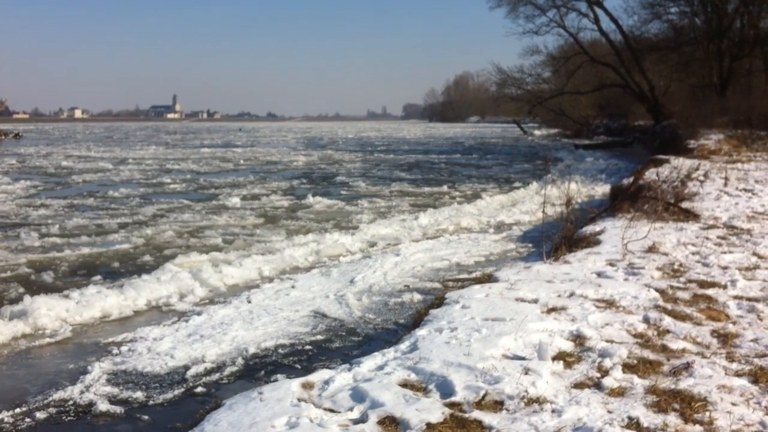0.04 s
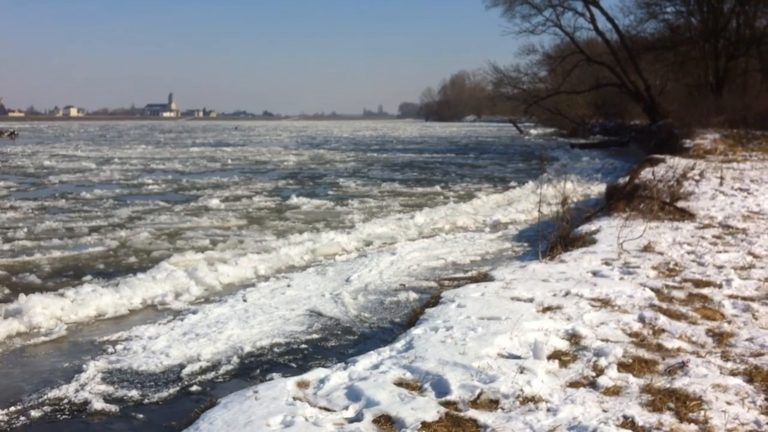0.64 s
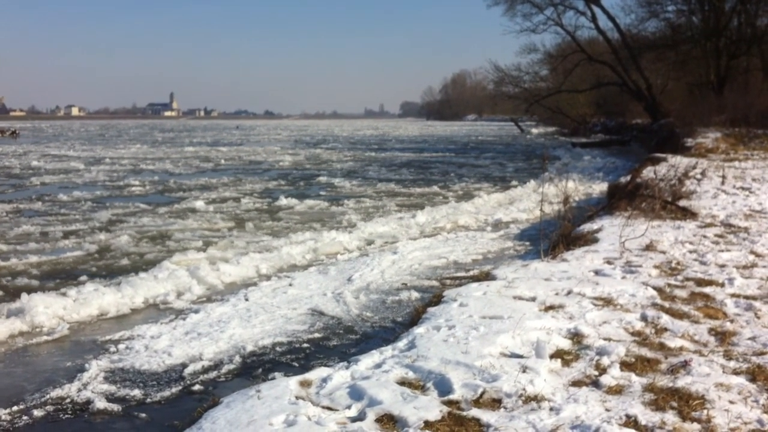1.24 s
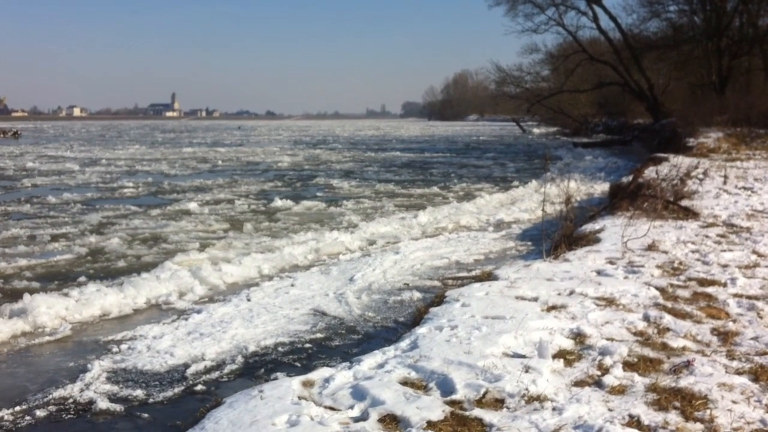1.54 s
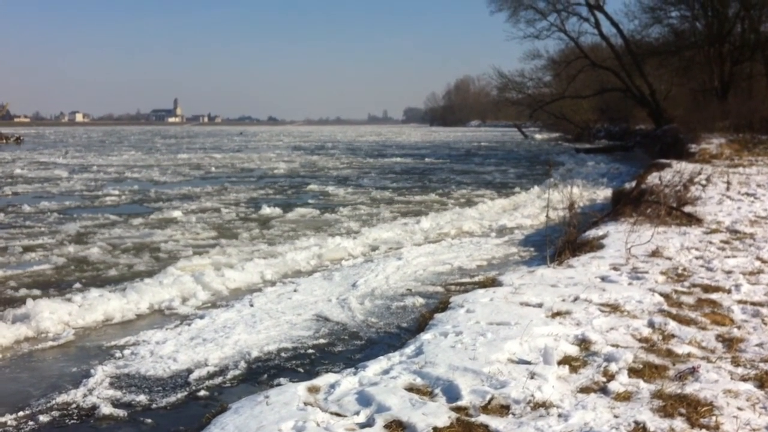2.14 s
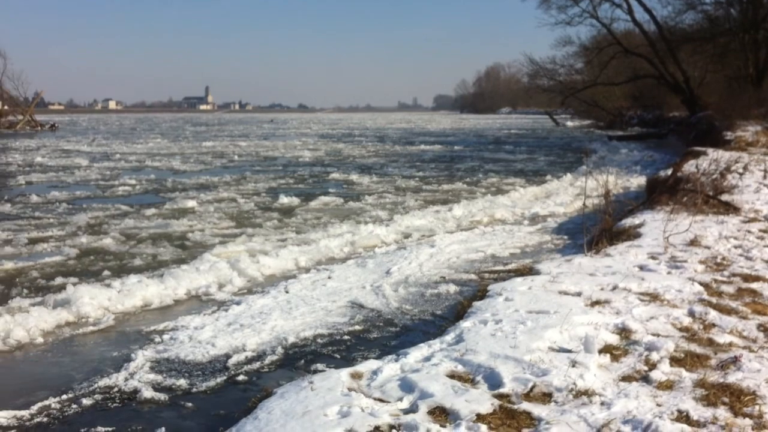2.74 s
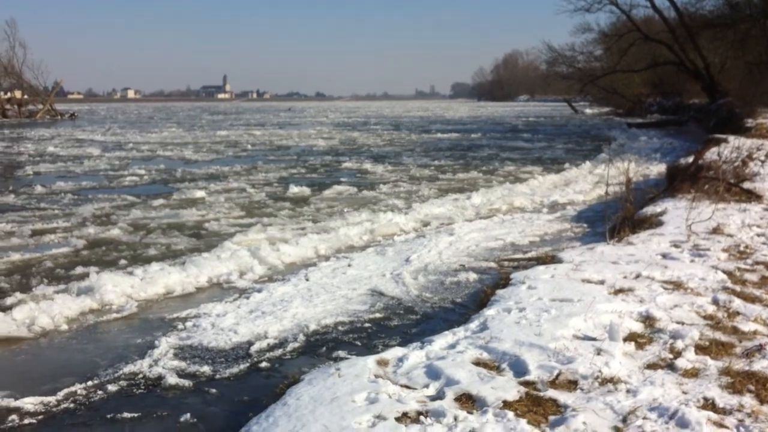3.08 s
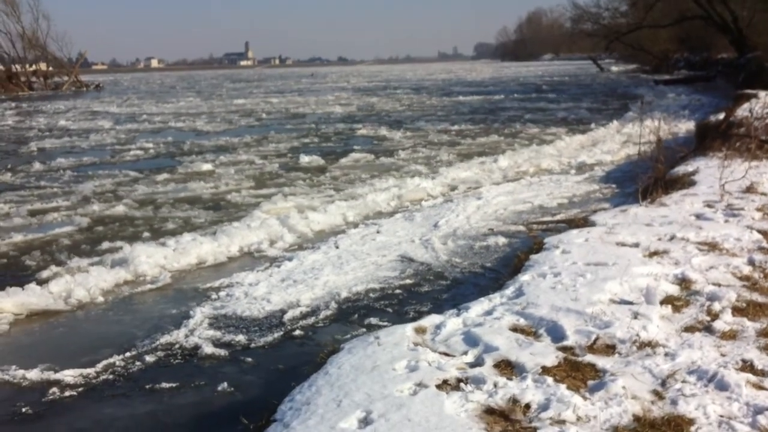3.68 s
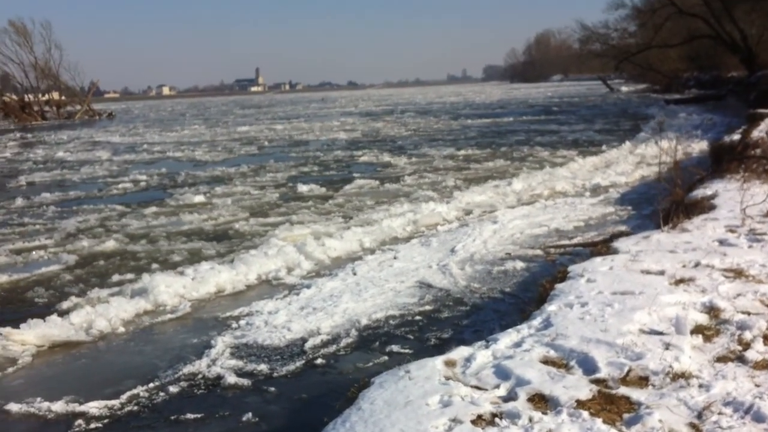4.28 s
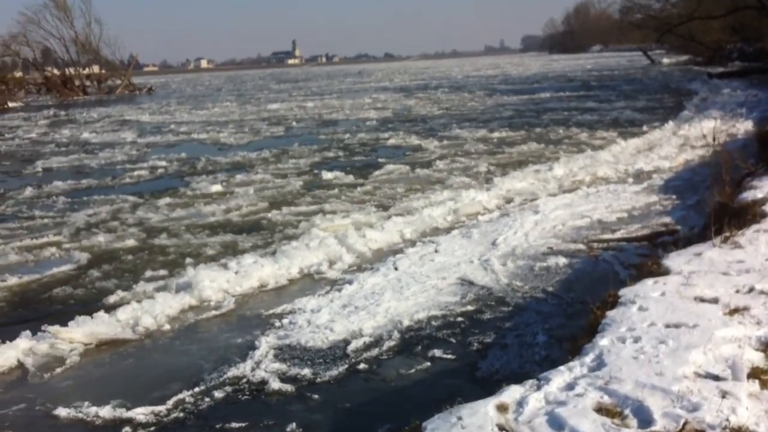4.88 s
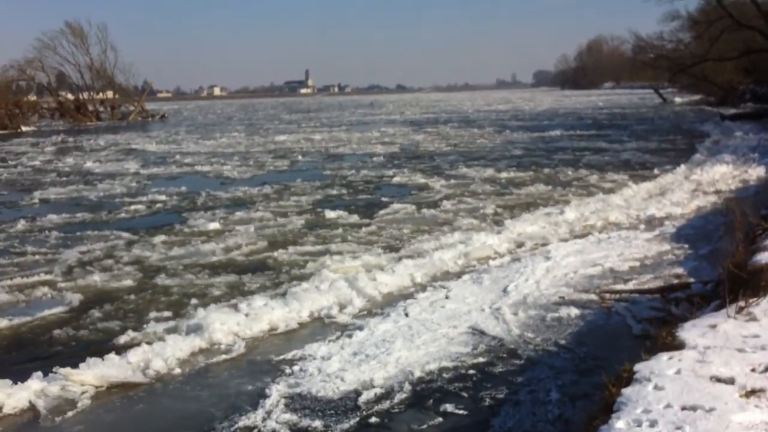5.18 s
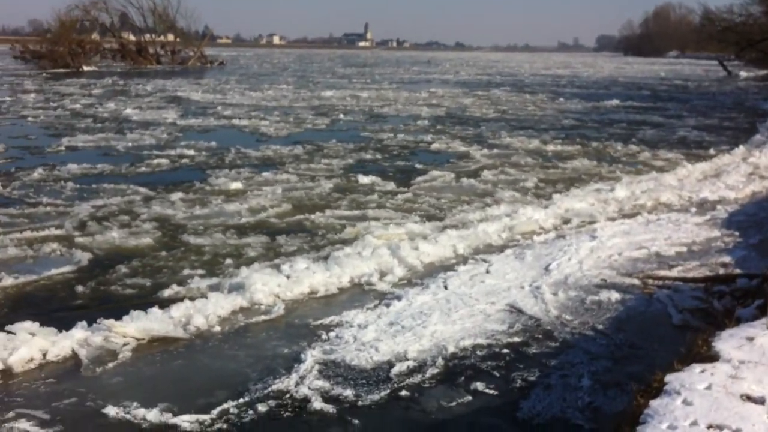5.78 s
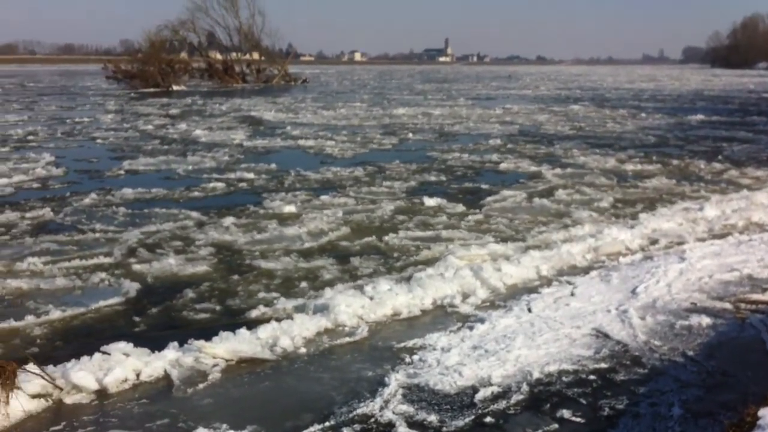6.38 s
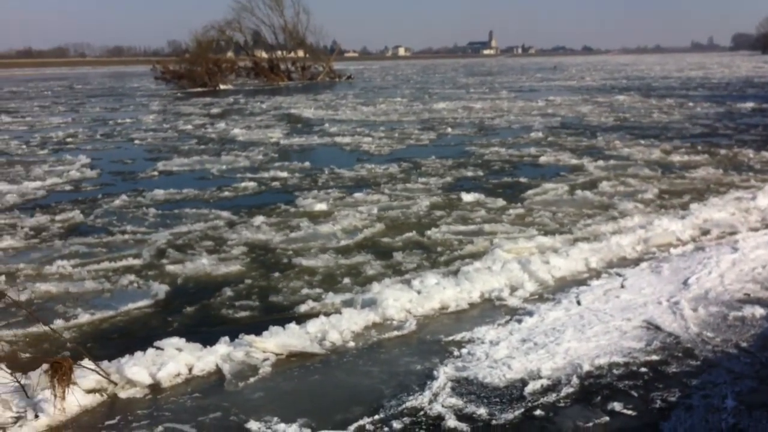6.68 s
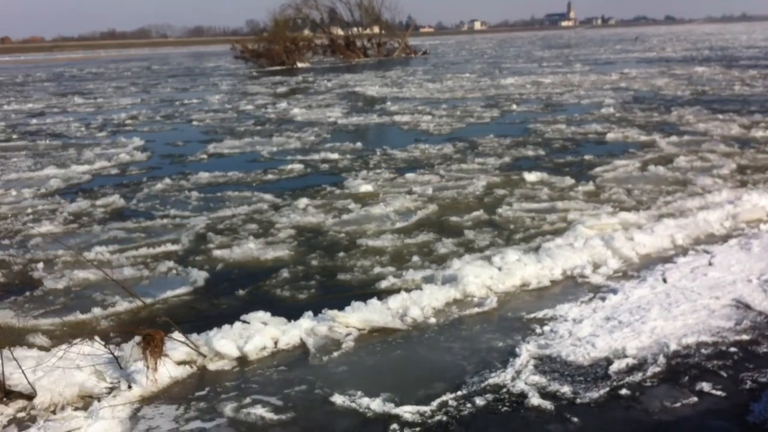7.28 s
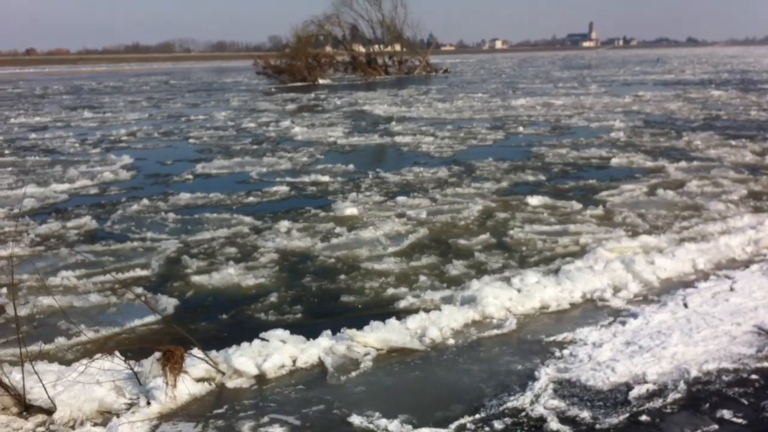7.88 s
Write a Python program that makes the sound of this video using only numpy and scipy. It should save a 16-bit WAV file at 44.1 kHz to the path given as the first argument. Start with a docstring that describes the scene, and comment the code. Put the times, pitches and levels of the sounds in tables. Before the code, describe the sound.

Gusts thump on the microphone, a sharp handling knock follows, then ice floes softly rub, bump and crackle in lapping water.

```python
"""Snowy river bank, drifting ice floes. Water washes and splashes between them; rims rub, scrape
and bump; slush fizzes, thin ice snaps and clinks, trapped air glugs. Light wind buffets the
microphone for the first 4 s. Its housing takes one sharp knock, then it turns to the open river:
fuller wash, more near bumps. Far off, a small bird and a low rumble."""
import sys
import numpy as np
from scipy import signal
from scipy.fft import rfft, irfft, next_fast_len
from scipy.io import wavfile
from scipy.ndimage import uniform_filter1d, map_coordinates

SR = 44100
rng = np.random.default_rng(int(sys.argv[2]) if len(sys.argv) > 2 else 0)


def dump(signal):
    """Clip the signal to [-1, 1] and save it as 16-bit WAV at the path in sys.argv[1]."""
    limited = np.clip(np.atleast_2d(signal).T, -1, 1)
    pcm = np.round(limited * 32767).astype(np.int16)
    wavfile.write(sys.argv[1], SR, pcm)


N = 349713
TURN_S = 4  # microphone turns from bank to river

# water between floes: t/s, level/dB
WASH_LEVELS = [(0, -63.5), (3.0, -63.5), (3.3, -59), (4.75, -62.5), (4.95, -57.5), (5.5, -58), (6.65, -59),
               (7.93, -60)]
# water spectrum: f/Hz, level/dB
WASH_SPECTRUM = [(60, -33), (200, -11), (320, -1.5), (480, 2), (800, -0.5), (1100, 1), (1450, -2),
                 (1900, -15.5), (3500, -20)]
# how hard the floes press together: t/s, level/dB
FLOE_PRESSURE = [(0, -2), (.9, 0), (1.38, -1.5), (1.75, 0.4), (2.25, -0.7), (3.1, 1.5), (4.35, -1.1),
                 (5.1, 0.35), (6.1, 0.1), (6.9, 2.5), (7.45, 0.5), (7.93, 1.5)]
# ice spectra, along the bank and on the open river: f/Hz, level/dB
BANK_SPECTRUM = [(350, -45), (600, -15), (789, 2), (930, -11), (995, -8), (1260, -2), (1310, -11.5),
                 (1630, -1.5), (1900, -3), (2250, -1.5), (3020, -5), (5280, -7.5), (5820, -7.5),
                 (11800, -11.5), (15800, -19)]
RIVER_SPECTRUM = [(350, -30), (600, 0), (778, -3), (982, 6), (1420, -8.5), (1540, -4), (2030, -4.5),
                  (2670, -4.5), (3060, -5.5), (5280, -5.5), (12200, -10.5), (14900, -11), (15800, -21)]
# near floe collisions: t/s, level/dB, f/Hz
NEAR_BUMPS = [(3.405, -34, 696), (4.254, -39, 800), (5.091, -40, 410), (5.328, -42, 323),
              (5.368, -36, 1300), (5.4918, -34.5, 800), (5.4928, -29, 1900), (5.495, -31.5, 450),
              (5.728, -35, 950), (6.255, -40, 720), (6.609, -31.5, 1540), (6.805, -37, 1700),
              (7.432, -47, 600), (7.4935, -31, 1170)]
# near ice snaps: t/s, level/dB, f/Hz, decay/s, Q
NEAR_CRACKLES = [(.232, -56, 2300, 0.0062, 6.7), (.797, -54, 4500, 0.0097, 6), (.886, -57, 2700, 0.0089, 7),
                 (1.142, -53, 12500, 0.032, 2.8), (1.609, -47.5, 2600, 0.004, 6),
                 (1.608, -49.5, 3480, .006, 11), (1.643, -51, 14500, .014, 5),
                 (1.725, -50, 11500, 0.022, 1.8), (2.436, -57, 3600, 0.0071, 12),
                 (2.556, -56, 3850, .006, 12), (2.573, -52, 10000, .015, 3.5), (2.592, -53, 3870, .01, 12),
                 (4.58, -39.5, 6200, 0.0019, 11), (4.5825, -49, 3730, 0.0025, 12),
                 (4.6085, -51, 4750, .002, 4.4), (4.609, -50, 12900, .002, 9), (4.97, -52, 3600, 0.0085, 2),
                 (5.158, -47.5, 9700, .004, 4.4), (5.708, -52, 12000, 0.011, 1.8),
                 (5.755, -52, 7600, .008, 5.2), (6.212, -58, 13200, 0.014, 14),
                 (6.51, -53, 10000, .007, 3.5), (6.529, -48.5, 3900, 0.0035, 4),
                 (7.008, -43, 2280, .0055, 3.5), (7.0095, -42.5, 8000, 0.0031, 1.1),
                 (7.028, -52, 3800, .012, 4), (7.033, -47, 10500, .002, 5), (7.0647, -43, 5000, 0.004, 1.5),
                 (7.398, -48, 4700, 0.0023, 9), (7.426, -52, 2500, 0.0044, 7.8),
                 (7.4935, -45.5, 4000, 0.0016, 2.1)]
# modes of a thin ice plate: f/Hz, width/Hz, level/dB
PLATE_MODES = [(2340, 420, 1.5), (3720, 510, -4), (6170, 700, -2)]
# grazes on the plate: t/s, level/dB, decay/s, tilt/(dB/oct)
PLATE_GRAZES = [(4.561, -47.5, 0.0099, 1.5), (4.572, -54, 0.0088, -2), (4.585, -54, 0.0088, -3),
                (4.607, -55, 0.0094, -10)]
# rim scrapes (first, last row) and wind wisps in the gust (middle two): t/s, length/s, level/dB, f/Hz
SHORT_RASPS = [(0.864, 0.051, -57.5, 1650), (1.944, .05, -58, 1200), (2.13, .03, -56.5, 1200),
               (5.678, .11, -54, 945)]
# air bubbles under the ice: t/s, level/dB, start f/Hz
AIR_BUBBLES = [(6.272, -55, 290), (6.282, -54, 145), (6.305, -55, 250), (6.316, -55, 433),
               (6.365, -57, 606), (6.383, -58, 830), (6.479, -56, 516), (6.491, -55, 840), (7.49, -49, 194)]
# gusts: t/s, length/s, level/dB
WIND_GUSTS = [(0.362, 0.42, -55), (0.922, 0.11, -46.5), (1.672, 0.034, -57), (1.955, 0.47, -44.5),
              (2.522, 0.15, -50), (2.806, 0.26, -56.5), (3.124, 0.065, -49.5), (3.28, 0.17, -46.5),
              (3.502, 0.19, -51), (3.807, 0.19, -59.5)]
# hardest eddies, single thumps: t/s, level/dB, f/Hz
HARD_EDDIES = [(.081, -28.5, 186), (.117, -32.5, 195), (.336, -34.5, 188), (.359, -32.5, 184),
               (0.394, -38, 159), (.451, -40, 163), (.926, -41.5, 188), (0.981, -42, 182),
               (1.006, -30, 188), (1.041, -39, 170), (1.894, -34, 178), (1.947, -28, 243),
               (1.953, -30.5, 230), (1.962, -24, 210), (1.984, -37, 200), (2.046, -28, 235),
               (2.063, -39, 208), (2.076, -32, 192), (2.088, -33, 212), (2.107, -31.5, 258),
               (2.115, -30, 208), (2.128, -31.5, 262), (2.154, -39, 162), (2.172, -34, 188),
               (2.185, -44, 135), (2.228, -29, 194), (2.256, -34, 185), (2.274, -35.5, 158),
               (2.283, -37, 245), (2.344, -35, 235), (2.352, -34, 190), (2.401, -37, 173),
               (2.415, -37, 166), (2.534, -38, 256), (2.545, -33.5, 200), (2.627, -42, 160),
               (2.848, -39, 188), (2.895, -40.5, 188), (3.137, -38, 192), (3.162, -35, 198),
               (3.188, -36.5, 233), (3.211, -35, 177), (3.304, -40, 180), (3.349, -28.5, 236),
               (3.378, -33, 186), (3.408, -37, 276), (3.53, -32, 248), (3.58, -35, 186),
               (3.615, -21.5, 230), (3.626, -27, 184), (3.638, -26, 209), (3.68, -37, 184),
               (3.834, -41, 184)]
# wind churn spectrum: f/Hz, level/dB
CHURN_SPECTRUM = [(25, -36), (50, -15), (95, -5), (140, 7.5), (220, -3), (310, -2), (450, -13), (800, -29),
                  (1500, -41)]
# contacts within the knock: t/s, level/dB
KNOCK_CONTACTS = [(3.6401, -34), (3.6446, -28.5), (3.6471, -13.5), (3.6511, -39), (3.659, -53)]
# microphone housing modes: f/Hz, level/dB, T60/s
HOUSING_MODES = [(225, -6, 0.027), (544, 10, 0.0057), (795, 1, 0.016), (1150, -1.5, 0.016),
                 (1650, 3, 0.0042), (2480, -7, 0.015), (5450, -9, 0.0016)]
# bird calls: t/s, level/dB
BIRD_PEEPS = [(.825, -59), (1.74, -62), (2.3, -64.5)]
# far rumble spectrum: f/Hz, level/dB
RUMBLE_SPECTRUM = [(20, -22), (45, -16.5), (90, -8), (140, -2.5), (205, 0.5), (260, 0), (340, -11),
                   (470, -14), (700, -20), (1500, -60)]


def wash():
    """Water between floes: patchy, slightly grainy noise."""
    water = patchy(depth_db=1.97) + 0.29 * grains(per_s=250, spread_db=1.0)
    return amp(curve(WASH_LEVELS)) * unit(filtered(water, lambda hz: colour(WASH_SPECTRUM, hz)))


def rubbing():
    """Rims rub: grainy hiss, mid to high band."""
    friction = patchy(depth_db=1.31) + 0.46 * grains(per_s=400, spread_db=0.5)
    return amp(-56.5) * ice_hiss(friction, lambda hz: highpass(hz, 1330) * lowpass(hz, 8800))


def fizz():
    """Slush crystals break: top-band hiss, 3.5 dB lower after the knock."""
    fractures = patchy(depth_db=1.3) + 0.31 * grains(per_s=830, spread_db=14)
    after_knock = np.arange(N) / SR > KNOCK_CONTACTS[-1][0]
    return amp(-57 - 3.5 * after_knock) * ice_hiss(fractures, lambda hz: highpass(hz, 8660))


def pressure_gain():
    """Floes pressing harder rub and fizz louder."""
    return amp(curve(FLOE_PRESSURE) + 0.27 * wobble(9))


def ice_hiss(source, band):
    """One band of ice noise, crossfaded from bank to river spectrum at the turn."""
    turned = np.clip((np.arange(N) / SR - TURN_S) / 0.036, 0, 1)
    bank = unit(filtered(source, lambda hz: colour(BANK_SPECTRUM, hz) * band(hz)))
    river = unit(filtered(source, lambda hz: colour(RIVER_SPECTRUM, hz) * band(hz)))
    return (1 - turned) * bank + turned * river


def bumps(rise_cycles=0.27, fall_cycles=1.05):
    """Floes collide: a few damped, gritty cycles. Far bumps follow the wash level."""
    out, t = np.zeros(N), np.arange(SR // 30) / SR
    wash_db = curve(WASH_LEVELS)
    far = [(s, wash_db[int(s * SR)] + 15.5 + 2 * size, 950 * np.exp(.25 * pitch))
           for s, size, pitch in scattered(per_s=3.6)]
    for s, db, hz in NEAR_BUMPS + far:
        body = np.sin(2 * np.pi * hz * t) + 0.15 * rng.standard_normal(len(t))
        envelope = (1 - np.exp(-t * hz / rise_cycles)) * np.exp(-t * hz / fall_cycles)
        add(out, s, amp(db) * body * envelope)
    return out


def crackles(far_db=-58, far_hz=5040, far_decay_s=.004, far_q=2.9):
    """Thin ice snaps: bright resonant noise bursts, fainter ones at random."""
    out = np.zeros(N)
    far = [(s, far_db + size, far_hz * np.exp(.4 * pitch), far_decay_s, far_q)
           for s, size, pitch in scattered(per_s=6)]
    for s, db, centre_hz, decay_s, q in NEAR_CRACKLES + far:
        snap = burst(lambda hz: resonance(hz, centre_hz, q), decay_s)
        add(out, s - 2 * decay_s, amp(db) * snap)
    return out


def clinks(grit_db=-15):
    """Grazes crunch on one thin plate and ring it; softer ones excite less of the upper modes."""
    out = np.zeros(N)
    low_hz, mid_hz = PLATE_MODES[0][0], PLATE_MODES[1][0]
    for s, db, decay_s, tilt_db_per_oct in PLATE_GRAZES:
        def plate(hz):
            ring = sum(amp(mode_db + tilt_db_per_oct * np.log2(mode_hz / low_hz))
                       * resonance(hz, mode_hz, mode_hz / width_hz) ** 2
                       for mode_hz, width_hz, mode_db in PLATE_MODES)
            return ring + amp(grit_db) * resonance(hz, mid_hz, q=.7)
        add(out, s - 2 * decay_s, amp(db) * burst(plate, decay_s))
    return out


def rasps():
    """Short mid-pitched rasps, rim scrapes and wind wisps: coarse grains swell in one resonance."""
    out, grit = np.zeros(N), grains(per_s=900, spread_db=5.5)
    for s, length_s, db, centre_hz in SHORT_RASPS:
        swell = np.sin(np.pi * np.linspace(0, 1, int(length_s * SR)))
        ring = filtered(grit[int(s * SR):][:len(swell)], lambda hz: resonance(hz, centre_hz, q=2.2))
        add(out, s, amp(db) * swell * unit(ring))
    return out


def splashes(typical_hz=682, glide_per_s=13, fall_cycles=3.65):
    """Tiny bubbles pop with rising pitch; level follows the wash."""
    out, t = np.zeros(N), np.arange(SR // 20) / SR
    wash_db = curve(WASH_LEVELS)
    for s, size, pitch in scattered(per_s=18):
        start_hz = typical_hz * np.exp(.45 * pitch)
        cycles = start_hz * t * (1 + glide_per_s * t / 2)
        envelope = (1 - np.exp(-2 * cycles)) * np.exp(-cycles / fall_cycles)
        db = wash_db[int(s * SR)] + 5 + 2.9 * min(size, 2)
        add(out, s, amp(db) * envelope * np.sin(2 * np.pi * cycles))
    return out


def gurgles(length_s=0.03, rise_oct=.35, waver_oct=0.2):
    """Trapped air escapes: one soft, unsteady, rising note per bubble."""
    out, progress = np.zeros(N), np.linspace(0, 1, int(length_s * SR))
    swell = np.sin(np.pi * progress) * np.exp(-3 * progress)
    for s, db, start_hz in AIR_BUBBLES:
        hz = start_hz * 2 ** (rise_oct * progress + waver_oct * wobble(290)[:len(progress)])
        add(out, s, amp(db) * swell / swell.max() * tone(hz))
    return out


def wind():
    """Gusts churn on the microphone and shed eddies, each edged with rough flutter."""
    strength = gust_strength()
    turbulence = rng.standard_normal(N) * amp(5.1 * wobble(60))
    churn = unit(filtered(turbulence, lambda hz: colour(CHURN_SPECTRUM, hz)))
    swings, envelope = eddies(strength)
    flutter = unit(filtered(rng.standard_normal(N), lambda hz: resonance(hz, 446, q=2.4) ** 2))
    return amp(-6) * strength * churn + swings + amp(-24) * envelope * flutter


def gust_strength(breeze_db=-62.5, attack_s=0.0063, sag_db_per_s=6, release_s=0.014):
    """Gusts hit, sag and drop, over a faint breeze that fades out by the turn."""
    t = np.arange(N) / SR
    strength = amp(breeze_db) * np.clip(TURN_S - t, 0, 1)
    for s, length_s, db in WIND_GUSTS:
        age_s = np.maximum(t - s, 0)
        attack = np.minimum(age_s / attack_s, 1)
        release = np.exp(-np.maximum(age_s - length_s, 0) / release_s)
        strength += attack * release * amp(db - sag_db_per_s * age_s)
    return strength


def eddies(strength, per_s=45, typical_hz=172, rise_cycles=0.2, fall_cycles=0.48, pitch_drop=0.11):
    """One short pressure swing per eddy, unevenly paced. Returns swings and summed envelope."""
    swings, envelope = np.zeros(N), np.zeros(N)
    t = np.arange(-SR // 50, SR // 30) / SR
    jitters, sizes, pitches, phases = rng.uniform(-1, 1, (600, 4)).T
    times_s = np.cumsum(1 + .6 * jitters) / per_s
    hard = [(s, amp(db), hz) for s, db, hz in HARD_EDDIES]
    weak = [(s, strength[int(s * SR)] * amp(3.5 + 4 * size), typical_hz * np.exp(.25 * pitch))
            for s, size, pitch in zip(times_s, sizes, pitches) if s < TURN_S]
    for (s, peak, hz), phase in zip(hard + weak, phases):
        cycles = t * hz
        swell = 1 / (np.exp(-cycles / rise_cycles) + np.exp(cycles / fall_cycles))
        swell = peak * swell / swell.max()
        slowed_cycles = cycles - pitch_drop * np.maximum(cycles, 0)
        add(swings, s + t[0], swell * np.cos(2 * np.pi * slowed_cycles + np.pi * phase))
        add(envelope, s + t[0], swell)
    return swings, envelope


def knock(push_s=0.00039, grit_t60_s=0.0061):
    """A hard tap rattles the damped microphone housing; finite contact time dulls the top."""
    out, t = np.zeros(N), np.arange(SR // 20) / SR
    ring = sum((-1) ** k * amp(db - 60 * t / t60_s) * np.sin(2 * np.pi * hz * t)
               for k, (hz, db, t60_s) in enumerate(HOUSING_MODES))
    push = 1.35 * (1 - t / push_s) * np.exp(-t / push_s)
    for s, db in KNOCK_CONTACTS:
        grit = 0.35 * amp(-60 * t / grit_t60_s) * rng.standard_normal(len(t))
        add(out, s, amp(db) * (ring + push + grit) / np.abs(ring).max())
    return filtered(out, lambda hz: lowpass(hz, 11500, order=4))


def bird(length_s=0.1, start_hz=5700, rise_hz=241, waver_hz=65):
    """Small far bird: thin, rough, slightly rising peeps."""
    out, progress = np.zeros(N), np.linspace(0, 1, int(length_s * SR))
    for s, db in BIRD_PEEPS:
        hz = start_hz + rise_hz * progress + waver_hz * wobble(374)[:len(progress)]
        add(out, s, amp(db) * np.sin(np.pi * progress) * tone(hz))
    return out


def rumble():
    """Far low rumble of patchy noise."""
    return amp(-66) * unit(filtered(patchy(depth_db=2.0), lambda hz: colour(RUMBLE_SPECTRUM, hz)))


def amp(db):
    """dB to gain."""
    return 10 ** (np.asarray(db) / 20)


def unit(x):
    """Scale to rms 1."""
    return x / np.sqrt(np.mean(x ** 2) + 1e-20)


def add(track, s, sound):
    """Mix in at s seconds."""
    part = track[max(round(s * SR), 0):][:len(sound)]
    part += sound[:len(part)]


def tone(hz):
    """Sine with per-sample frequency."""
    return np.sin(2 * np.pi * np.cumsum(hz) / SR)


def curve(points):
    """(t/s, value) points to one value per sample."""
    return np.interp(np.arange(N) / SR, *np.transpose(points))


def wobble(knots_per_s):
    """Smooth random curve."""
    knots = rng.standard_normal(int(N * knots_per_s / SR) + 4)
    return map_coordinates(knots, [np.arange(N) * knots_per_s / SR])


def scattered(per_s):
    """Poisson events: t/s, size, pitch (both standard normal)."""
    draws = rng.standard_normal((400, 4))
    times_s = np.cumsum(.5 * (draws[:, 0] ** 2 + draws[:, 1] ** 2)) / per_s
    return np.column_stack([times_s, draws[:, 2:]])[times_s < (N - 1) / SR]


def patchy(depth_db):
    """Noise whose level drifts in small time-frequency patches, rms 1."""
    spectra = signal.stft(rng.standard_normal(N), nperseg=512)[2]
    patches = uniform_filter1d(rng.standard_normal(spectra.shape), size=9, axis=0)
    patches = uniform_filter1d(patches, size=14, axis=1)
    return unit(signal.istft(spectra * amp(depth_db * unit(patches)), nperseg=512)[1][:N])


def grains(per_s, spread_db):
    """Random impulses of uneven size, rms 1."""
    hits = (rng.random(N) < per_s / SR) * rng.choice([-1, 1], N)
    return unit(hits * amp(spread_db * np.clip(rng.standard_normal(N), -2, 2)))


def burst(band, decay_s):
    """Coloured noise: swells to rms 1 at 2 * decay_s, then dies."""
    age_s = np.arange(SR // 8) / SR - 2 * decay_s
    rise_s = .25 * decay_s
    envelope = np.exp(np.minimum(age_s / rise_s, -age_s / decay_s))
    return envelope * unit(filtered(rng.standard_normal(len(age_s)), band))


def filtered(x, response):
    """Zero-phase filter of gain response(hz)."""
    size = next_fast_len(len(x) + 8192)
    return irfft(rfft(x, size) * response(np.fft.rfftfreq(size, 1 / SR)), size)[:len(x)]


def colour(points, hz):
    """Gain from (f/Hz, level/dB) points, log frequency axis."""
    points_hz, db = np.transpose(points)
    return amp(np.interp(np.log(hz + 1), np.log(points_hz + 1), db))


def highpass(hz, edge_hz, order=6):
    """High-pass gain."""
    ratio = (hz / edge_hz) ** order
    return ratio / np.sqrt(1 + ratio ** 2)


def lowpass(hz, edge_hz, order=6):
    """Low-pass gain."""
    return np.sqrt(1 - highpass(hz, edge_hz, order) ** 2)


def resonance(hz, centre_hz, q):
    """Gain of one resonance."""
    return 1 / np.sqrt(1 + (q * (hz / centre_hz - centre_hz / (hz + 1))) ** 2)


def scene():
    """Mono on both channels. Microphone bass roll-off on wind, knock and bumps."""
    blows = filtered(wind() + knock() + bumps(), lambda hz: highpass(hz, 95, order=3))
    drift = wash() + (rubbing() + fizz()) * pressure_gain() + rumble()
    mono = drift + blows + rasps() + splashes() + gurgles() + crackles() + clinks() + bird()
    return np.array([mono, mono])


def record(dry):
    """Brick-wall band limit."""
    return np.array([filtered(channel, lambda hz: hz < 15850) for channel in dry])


dry = scene()
out = record(dry)
dump(out)
```